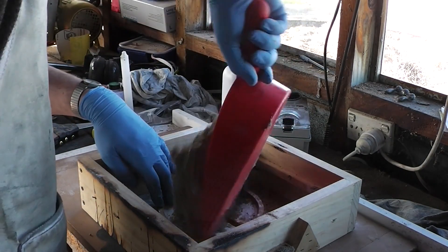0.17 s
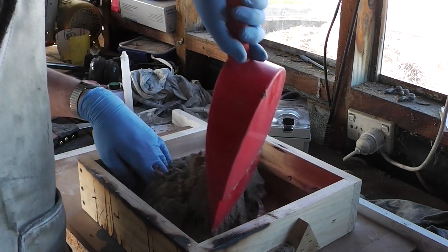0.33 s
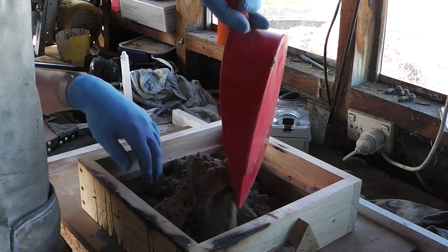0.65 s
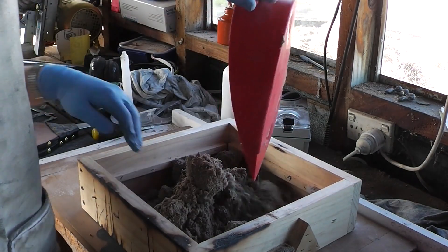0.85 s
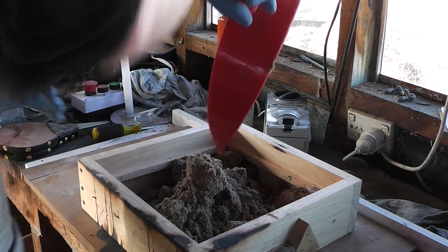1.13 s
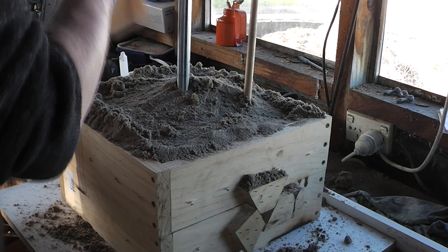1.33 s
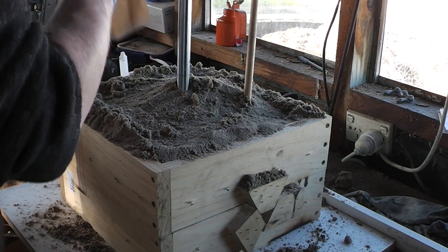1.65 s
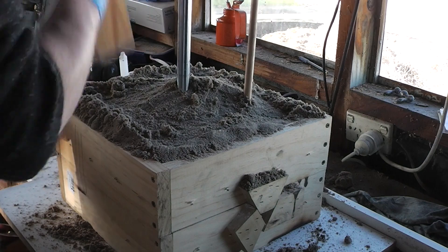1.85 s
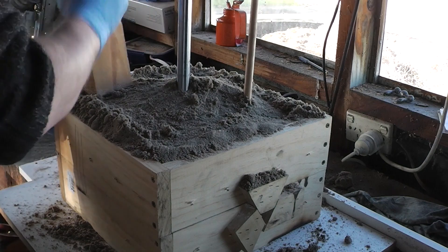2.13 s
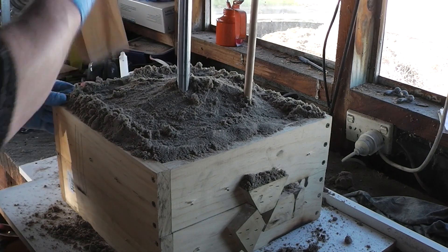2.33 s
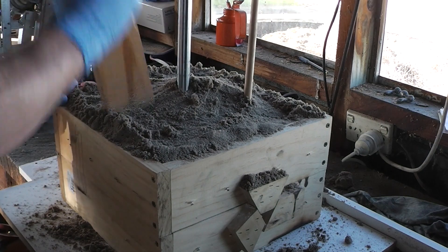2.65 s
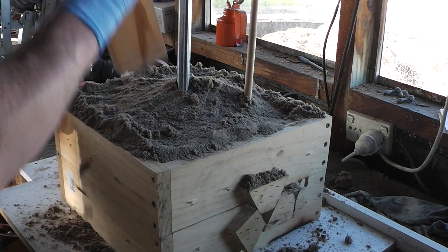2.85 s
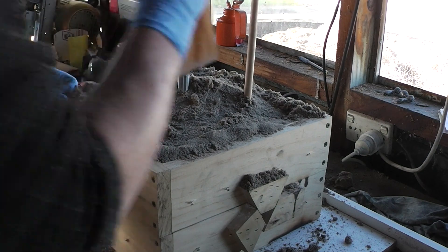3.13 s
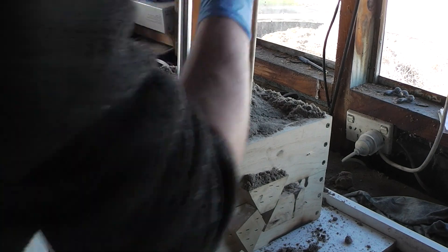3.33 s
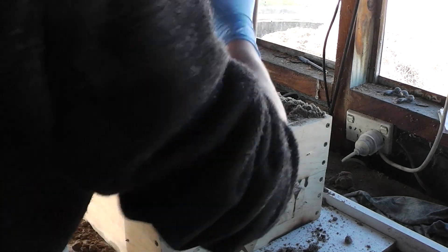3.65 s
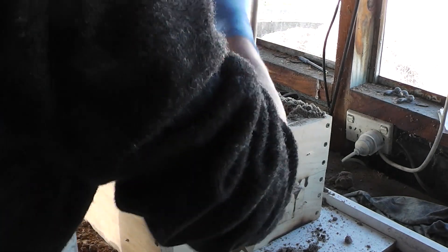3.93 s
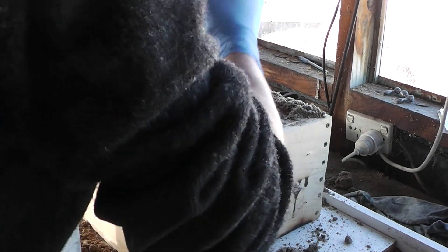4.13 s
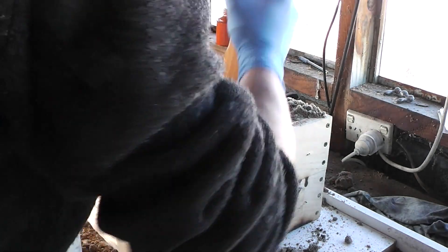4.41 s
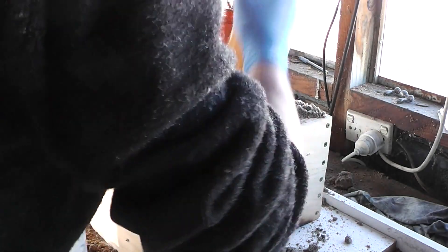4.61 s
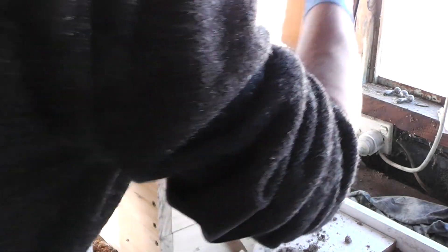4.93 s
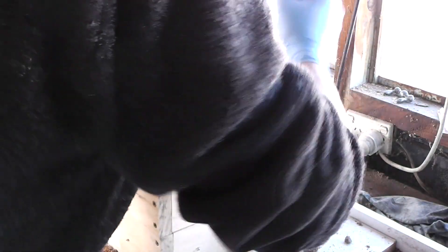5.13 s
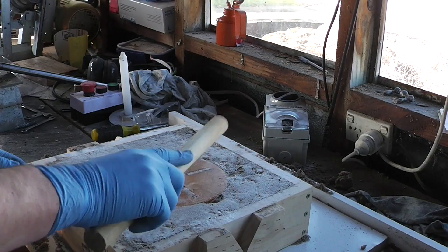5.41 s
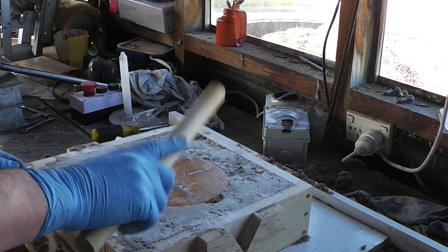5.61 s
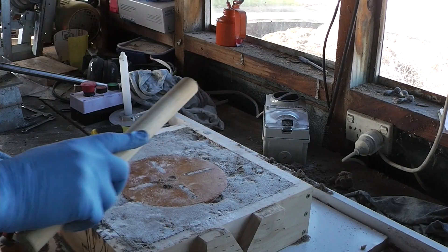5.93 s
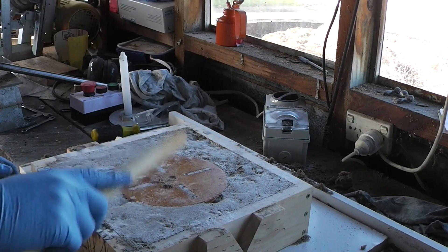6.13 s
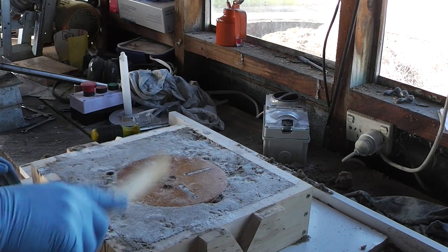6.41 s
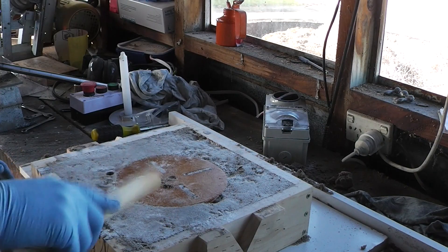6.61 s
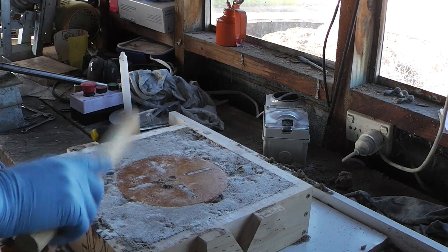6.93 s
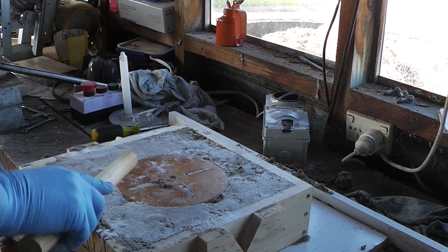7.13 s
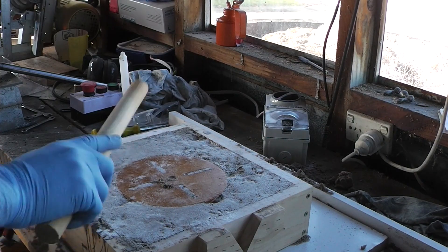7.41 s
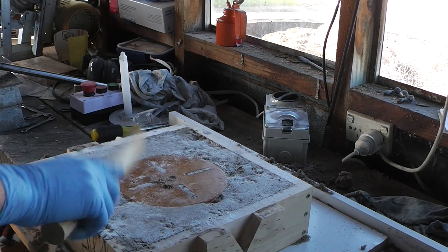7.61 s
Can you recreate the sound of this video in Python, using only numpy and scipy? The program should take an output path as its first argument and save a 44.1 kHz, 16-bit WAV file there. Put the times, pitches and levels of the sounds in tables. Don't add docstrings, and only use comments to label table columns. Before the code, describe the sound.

In a small workshop with a low fan hum, a scoop tips sand into a wooden box: a slide, a thud and a brief hissing rush. A rammer then thumps the sand unevenly, shaking box and bench, with crumbling grains and sleeve rubs between blows. A harder rim knock ends it, and abruptly a wooden rod taps a plate in loud sharp cracks. Close stereo microphone, short room echo.

```python
import sys
import numpy as np
from scipy import signal
from scipy.io import wavfile
from scipy.ndimage import uniform_filter1d

SR = 44100
rng = np.random.default_rng(int(sys.argv[2]) if len(sys.argv) > 2 else 0)


def generate_wav(sig):
    pcm = np.round(np.clip(np.atleast_2d(sig).T, -1, 1) * 32767).astype(np.int16)
    wavfile.write(sys.argv[1], SR, pcm)


def volts_from_decibels(level):
    exponent = np.asarray(level, float) / 20
    return 10 ** exponent


N = 342255
SCENE_CHANGE_S = 5.363
RUSH_S = 0.228
TAP_CUT_HZ = 12000


def at_hz(points, hz):
    log_hz, values = np.log(np.array(points)[:, 0]), np.array(points)[:, 1]
    return np.interp(np.log(hz), log_hz, values)


def clicks(s, db):
    train = np.full(N, 1e-18)
    places = np.round(np.asarray(s) * SR).astype(int)
    np.add.at(train, np.minimum(places, N - 1), volts_from_decibels(db))
    return train


def ring(x, hz, t60):
    r = volts_from_decibels(-60 / (t60 * SR))
    w = 2 * np.pi * hz / SR
    return signal.lfilter([0, np.sin(w)], [1, -2 * r * np.cos(w), r * r], x)


def strike(s, db, modes, spread_db, scatter_s):
    luck = rng.standard_normal((len(s), 2, len(modes)))
    total = 0
    for k, (hz, level_db, t60) in enumerate(modes):
        start = s + scatter_s * abs(luck[:, 1, k])
        strength_db = db + level_db + spread_db * luck[:, 0, k]
        total = total + ring(clicks(start, strength_db), hz, t60) * (-1) ** k
    return total


def soften(x, cut_hz):
    return signal.sosfilt(signal.butter(2, cut_hz, fs=SR, output="sos"), x)


# frequency in Hz, likeness (1 = the same)
LIKENESS = [(40, 0.78), (250, 0.98), (1000, 0.89), (2500, 0.85), (5000, 0.64), (9000, 0.75), (14000, 0.1)]


def bands(low_hz, high_hz, size):
    white = rng.standard_normal((2, 2, size))
    edges = 25 * 2 ** np.arange(0, 9.5, 1 / 3)
    for k, (low, high) in enumerate(zip(edges, edges[1:])):
        if low_hz < high and low < high_hz:
            band_pass = signal.butter(2, [low, high], "band", fs=SR, output="sos")
            mid, side = signal.sosfilt(band_pass, white[k % 2])
            alike = np.clip(at_hz(LIKENESS, low), 0, 1)
            stereo = np.sqrt(1 + alike) * mid + np.sqrt(1 - alike) * side * [[1], [-1]]
            yield np.sqrt(low * high), stereo


def noise(spectrum):
    out = sum(volts_from_decibels(at_hz(spectrum, hz)) * band for hz, band in bands(spectrum[0][0], spectrum[-1][0], size=N))
    return out / out.std()


def bursts(s, db, length_s):
    out = np.zeros(N)
    for start, level_db, span in zip(s, db, length_s):
        first = round(start * SR)
        fall = out[first:first + SR // 2]
        fall += volts_from_decibels(level_db - 20 * np.arange(len(fall)) / SR / max(span, .001))
    return out


def swell(middle_s, length_s, db):
    place = (np.arange(N) / SR - middle_s) / length_s
    return volts_from_decibels(db) * np.cos(np.pi * np.clip(place, -.5, .5)) ** 2


def grit(per_s, size_db):
    lumps = (rng.random(N) < per_s / SR) * volts_from_decibels(size_db * np.minimum(rng.exponential(1, N), 4))
    lumps = signal.lfilter([1], [1, -.96], lumps) + 2.1
    return lumps / np.sqrt(np.mean(lumps ** 2))


# frequency in Hz, time to fall 60 dB in seconds
ROOM_T60 = [(60, 1), (300, 0.3), (1000, 0.25), (2800, 0.2), (8000, 0.17), (15000, 0.2)]


def room(x):
    t = np.arange(SR // 2) / SR
    late_db, late_stretch = -13, 2.68
    tail = 0
    for hz, band in bands(40, 16000, size=len(t)):
        fall_db = -60 * t / at_hz(ROOM_T60, hz)
        tail = tail + band * (volts_from_decibels(fall_db) + volts_from_decibels(late_db + fall_db / late_stretch))
    tail = tail * np.minimum(t / 0.0015, 1)
    tail = tail / np.sqrt(np.sum(tail ** 2) / 2)
    return signal.fftconvolve(x, tail, axes=1)[:, :N]


def shaking(rest_db, shake_db, swell_s, fall_s):
    t = np.arange(N) / SR
    ramming = t < SCENE_CHANGE_S
    out = volts_from_decibels(rest_db - 4 * (t > SCENE_CHANGE_S))
    lump = (RUSH_S, -28)
    for at, bench_db in [lump] + [(row[0], row[3]) for row in RAMS]:
        rise = np.clip((t - at) / swell_s, 0, 1)
        out += ramming * rise * volts_from_decibels(bench_db + shake_db - 20 * np.maximum(t - at, 0) / fall_s)
    return out


# frequency in Hz, level in dB per Hz
FAN = [(180, -57), (300, 1), (680, 2), (935, 5), (1020, -1.5), (1560, -2), (1730, -7.5), (1980, -19),
       (3000, -82), (3900, -66), (6600, -120)]
AIR_HISS = [(2000, -30), (2800, -17), (3500, -9), (4300, -1), (7000, -2), (10500, -1), (12500, -10),
            (15500, -15), (16500, -22)]
FLOOR_RUMBLE = [(22, 8), (36, 10), (50, -2.5), (70, 1.5), (120, -10.5), (160, -13)]
BOX_DRONE = [(100, 2.5), (140, 5), (200, 10), (300, 0), (420, -3)]
LOOSE_BOARDS = [(30, -11), (60, 3), (110, 1), (200, -10.5), (400, -15), (800, -13)]
# middle in seconds, length in seconds, dull part in dB, bright part in dB
SLEEVE = [
    (0.574, 0.07, -74, -48.5),
    (1.18, .35, -73, -64),
    (3.074, 0.42, -52.5, -70),
    (4.145, 0.86, -48.5, -66.5),
    (6.938, 0.29, -52.5, -57.5),
]


def background(pour_db):
    fan_db = -50
    dull = sum(swell(middle_s, length_s, dull_db) for middle_s, length_s, dull_db, _ in SLEEVE)
    bright = sum(swell(middle_s, length_s, bright_db) for middle_s, length_s, _, bright_db in SLEEVE)
    air = (volts_from_decibels(fan_db) + volts_from_decibels(pour_db + 2) + dull) * noise(FAN)
    air += (volts_from_decibels(fan_db - 15) + bright) * noise(AIR_HISS)
    air += shaking(rest_db=-84, shake_db=-13, swell_s=0.024, fall_s=0.25) * noise(LOOSE_BOARDS)
    air += shaking(rest_db=-50, shake_db=-16.5, swell_s=0.15, fall_s=0.59) * noise(FLOOR_RUMBLE)
    air += shaking(rest_db=-54, shake_db=-29, swell_s=0.01, fall_s=0.55) * noise(BOX_DRONE)
    return air


def ducking():
    depth_db, hold_s, recover_db_per_s = 17.5, 0.07, 57
    t = np.arange(N) / SR
    taps_s = np.array(sorted(row[0] for row in ALL_TAPS))
    latest_s = np.append(-N, taps_s)[np.searchsorted(taps_s, t)]
    drop_db = np.clip(depth_db - recover_db_per_s * (t - latest_s - hold_s), 0, depth_db)
    drop_db = drop_db * (t > SCENE_CHANGE_S)
    return volts_from_decibels(-uniform_filter1d(drop_db, size=400))


def pour():
    t = np.arange(N) / SR
    slide_db = -48.5 - 4 * t
    rush_db = -38.5 - 95 * (t - RUSH_S)
    return np.where(t < RUSH_S, slide_db, rush_db)


# start in seconds, level in dB
SCOOP_DUMP = [(.224, -27), (.236, -26.5), (0.253, -29.5), (0.286, -30)]
# frequency in Hz, level in dB, time to fall 60 dB in seconds
SCOOP = [(111, -12.5, 0.13), (196, -2.5, 0.07), (315, 3, 0.07), (447, 5.5, 0.033), (655, 4.5, 0.067),
         (750, -2, 0.055), (1000, -16, 0.025), (1460, -3, 0.02)]


def scoop(pour_db):
    hum = ring(rng.standard_normal(N), 475, 0.17)
    hum_gain = volts_from_decibels(pour_db - 1.5) + swell(.15, 0.094, -42)
    lump = strike(*np.transpose(SCOOP_DUMP), SCOOP, 2.5, 0.00294)
    return soften(lump, 2100) + hum_gain * hum / hum.std()


# start in seconds, peak in dB, length in seconds
CRUMBS = [(0.223, -31, 0.0046), (0.9113, -49.5, 0.021), (1.038, -47.5, 0.036), (1.181, -51, 0.027),
          (1.276, -51, 0.075), (1.375, -35.5, 0.01), (1.637, -40, 0.017), (1.932, -41, 0.032),
          (2.004, -47.5, 0.0089), (2.639, -49.5, 0.02), (2.928, -48.5, 0.039), (2.9926, -42, 0.049),
          (3.13, -56, 0.021), (3.275, -55.5, 0.031), (3.314, -49, 0.095), (3.449, -50, 0.014),
          (3.577, -48, 0.024), (3.719, -49.5, 0.021), (4.486, -51.5, 0.051), (5.2055, -35, 0.004),
          (5.218, -30, 0.0032), (5.238, -34, 0.0035), (5.24, -48, 0.004)]
# start in seconds, peak in dB
TICKS = [(0.05, -28), (0.2259, -11.5), (0.5715, -25), (1.188, -29.5), (2.4382, -11.5), (2.9282, -40)]


def loose_sand(sand, crunch, pour_db):
    crumbling = (crunch + bursts(*np.transpose(CRUMBS))) * grit(per_s=960, size_db=5.5) * sand
    pouring = volts_from_decibels(pour_db) * grit(per_s=1700, size_db=5.5) * sand
    snap_s, snap_db = np.transpose(TICKS)
    snaps = strike(snap_s, snap_db - 9, CRACK, 0.96, 0)
    return crumbling + pouring + soften(snaps, TAP_CUT_HZ)


# start in seconds, thud peak in dB, thud pitch in Hz, bench level in dB,
# edge in dB (how hard the wood meets packed sand)
RAMS = [(1.323, -21.5, 319, -22.5, -41.5), (1.497, -11.5, 355, -18.5, -26.5),
        (1.941, -18, 312, -15.5, -28.5), (2.186, -12.5, 361, -15, -27.5), (2.437, -18, 280, -18.5, -30),
        (2.719, -23.5, 304, -19.5, -36.5), (2.963, -18, 311, -13.5, -30), (3.544, -32.5, 464, -51, -42),
        (3.671, -28, 250, -26, -40.5), (3.834, -28, 446, -26.5, -46.5), (3.871, -22, 248, -23, -34),
        (4.088, -18.5, 315, -21.5, -33.5), (4.441, -32, 277, -26, -40.5), (4.669, -20.5, 290, -21.5, -34.5),
        (5.177, -22.5, 338, -17.5, -21)]
# seconds after the blow, level in dB
JOLTS = [
    (0, -6),
    (.004, -2),
    (.011, -5),
    (.018, -9),
]
# seconds after the blow, level in dB
REBOUNDS = [
    (.035, -12.5),
    (.09, -9.5),
]
# start in seconds, peak in dB
PIPE_KNOCKS = [
    (3.7211, -8.5),
    (3.8355, -23),
]
# start in seconds, peak in dB
RIM_HITS = [
    (5.179, -9.5),
    (5.19, -28),
    (5.205, -33),
]
# frequency in Hz, level in dB, time to fall 60 dB in seconds
BOX = [(194.4, 8, 0.043), (260, 6.5, 0.1), (349, 9, 0.041), (433, -2.5, 0.032), (524, 5, 0.019),
       (636.4, -9, 0.098)]
WOOD_KNOCK = [(674, 4.5, 0.017), (909, 5, 0.012), (1282, 9, 0.0075), (1645, -0.5, 0.02),
              (1920, -0.5, 0.0088)]
BENCH = [(34, -5, 0.62), (37.7, -5.5, 0.26), (54.6, -2.5, 0.096), (64.9, -6, 0.32), (72.6, -2, 0.21),
         (89, -4, 0.12), (95.5, -6.5, 0.15), (163, -11.5, 0.23), (176, -8, 0.15)]
PIPE = [(464, -0.5, .02), (615, -6.5, 0.032), (760, -11, .08), (1344, -6, 0.043), (1310, -16, 0.1),
        (1513, -8.5, 0.093), (1590, -6.5, 0.071)]
RIM = [(352, 3, 0.039), (510, 1, 0.039), (590, 0, 0.035), (1020, 8, 0.017), (1660, 4.5, 0.0056)]


def rammer():
    s, thud_db, thud_hz, bench_db, edge_db = np.transpose(RAMS)
    knock_db = edge_db + 0.29 * (thud_db - edge_db) - 6
    thud = 0
    for at, db, hz in zip(s, thud_db, thud_hz):
        thud = thud + ring(clicks([at, at + 0.0054], [db, db + 6]), hz, 0.032)
    for at, db, hz in zip(s + 0.05, bench_db - 1.5, thud_hz):
        thud = thud + ring(clicks([at, at + 0.00442], [db - 4.5, db + 3]), hz, 0.03)

    steps = JOLTS + REBOUNDS
    uneven = np.exp(0.22 * rng.standard_normal((len(s), len(steps))))
    hits = [(s + lag_s * uneven[:, k], step_db) for k, (lag_s, step_db) in enumerate(steps)]
    jolts = hits[:len(JOLTS)]
    box = sum(strike(at, thud_db + db - 11.5, BOX, 0, 0.001544) for at, db in hits)
    knock = sum(strike(at, knock_db + db + 3.5, WOOD_KNOCK, 5.5, 0.001087) for at, db in jolts)
    knock += strike(*np.transpose(RIM_HITS), RIM, 1.7, 0.00074)
    bench = strike(s, bench_db - 4.5, BENCH, 1.9, 0.0042)
    bench += strike(s + 0.02955, bench_db, BENCH, 1.06, 0.0046)
    pipe_s, pipe_db = np.transpose(PIPE_KNOCKS)
    pipe = strike(pipe_s, pipe_db - 6, PIPE, 1.7, 0.00035)

    crunch = sum(bursts(at, edge_db - 7.5 + 2.33 * db, np.full(len(s), .01)) for at, db in jolts)
    sink_s = 0.036
    crunch += sum(swell(at + sink_s / 5, sink_s, db - 11) for at, db in zip(s, edge_db))
    wood = soften(thud + box, 1330) + soften(knock, 1700) + soften(pipe, 1380)
    return wood, soften(bench, 560), crunch


# start in seconds, snap peak in dB, slap in dB, ring in dB, low push into the bench in dB
TAPS = [(5.528, -1, -22.5, -28.5, -16), (5.72, -6, -24, -25, -33), (6.135, -14, -23.5, -19.5, -21),
        (6.321, -15, -21, -21.5, -34), (6.488, -13, -24.5, -22, -44), (6.683, -4.5, -21, -18.5, -53),
        (7.02, -5, -19.5, -16, -16), (7.183, -9, -21, -16, -16), (7.35, -11, -25, -21, -26),
        (7.526, -10, -27, -22.5, -48), (7.687, -3.5, -26.5, -23.5, -27)]
TAIL_TAP = [(5.354, -3, -19.5, -17.5, -44)]
BOUNCES = [
    (5.555, -15, -24.5, -44, -45),
    (6.521, -11, -24.5, -51, -52),
    (7.716, -12, -30.5, -31, -50),
]
ALL_TAPS = TAIL_TAP + TAPS + BOUNCES
# frequency in Hz, level in dB, time to fall 60 dB in seconds
SNAP = [(1134, -3.5, 0.0054), (1417, 8, 0.0027), (1814, -0.5, 0.0055)]
SLAP = [(142, -11, 0.022), (248, -8, 0.039), (420, -7, 0.01), (700, -8, 0.0041)]
CRACK = [(3240, 0.5, 0.0017), (4160, 4.5, 0.0017), (5670, 8, 0.0011), (6320, 4.5, 0.0024),
         (8490, 2.5, 0.0012), (10110, 5.5, 0.0024), (13000, 9, 0.00053), (14400, -7, 0.0022)]
ROD = [(970, -5, 0.055), (1053, -9, 0.16), (1075, -5, 0.12), (1266, -12, 0.042), (1553, 2.5, 0.011),
       (1784, -4, 0.03), (2050, -0.5, 0.017), (2680, -9.5, 0.046), (2768, -14.5, 0.098), (2810, -9, 0.026),
       (3270, -21, 0.018)]
PLATE = [(396.6, 1, 0.05), (507, 3.5, 0.03), (662.5, 3.5, 0.044), (824, 2.5, 0.016)]
FITTINGS = [(4700, -30, .12), (4790, -30, .16), (4870, -30, .14), (4945, -33, .25), (7280, -39, .6)]
# frequency in Hz, level in dB per Hz
SHUDDER = [(250, -25), (450, 3.5), (1000, 1.5), (2050, -16), (2400, -36), (3300, -41), (5000, -16),
           (12000, -29)]


def rod(sand):
    s, snap_db, slap_db, ring_db, push_db = np.transpose(ALL_TAPS)
    is_tap = np.arange(len(s)) < len(s) - len(BOUNCES)
    crack_db = np.where(is_tap, -19, -33)
    contact = strike(s, snap_db - 3, SNAP, 1.2, 0)
    contact += strike(s + .0005, slap_db + 3, SLAP, 1.2, 0)
    contact += strike(s, crack_db + 6, CRACK, 1.5, 0)
    contact += volts_from_decibels(-11.5) * np.roll(contact, round(0.0038 * SR))

    rings = strike(s, ring_db, ROD, 1.5, .0005)
    near = (s > 6.0) & is_tap
    rings += strike(s[near], np.full(near.sum(), -16), FITTINGS, 2.5, .0005)
    rings += strike(s, slap_db - 1, PLATE, 1.5, 0.0003)

    grains = bursts(s, crack_db - 6.5, np.full(len(s), .005)) * sand
    grains += bursts(s, slap_db - 9.5, np.full(len(s), 0.069)) * noise(SHUDDER)
    push = [(71, 0, 0.0086)]   # (Hz, dB, t60 s)
    grains += strike(s, push_db + 0.5, push, 0, 0)
    to_walls = soften(volts_from_decibels(-8.5) * contact + volts_from_decibels(-9.5) * rings, 8000)
    return soften(contact + grains, TAP_CUT_HZ) + rings + room(to_walls[None])


# frequency in Hz, level in dB per Hz
SAND = [(1470, -10), (2500, -0.5), (3210, -19.5), (3720, 4.5), (10400, 4), (12500, 1), (14800, -5),
        (16000, -17)]


def scene():
    pour_db = pour()
    sand = noise(SAND)
    wood, bench, crunch = rammer()
    thumps = wood + loose_sand(sand, crunch, pour_db) + scoop(pour_db)
    thumps = thumps + bench + room(volts_from_decibels(-10.5) * thumps + volts_from_decibels(-23.5) * bench)
    blows = np.where(np.arange(N) < SCENE_CHANGE_S * SR, thumps, rod(sand))
    return (blows + background(pour_db) * ducking()) * volts_from_decibels([[.3], [-.3]])


def top_cut(x):
    return signal.sosfilt(signal.butter(12, 17010, fs=SR, output="sos"), x)


def record(dry):
    x = signal.sosfilt(signal.butter(2, 26, "high", fs=SR, output="sos"), dry)
    limited = 1.712 * np.tanh(x / 1.494)
    mix = signal.sosfilt(signal.cheby2(8, 40, 16400, fs=SR, output="sos"), limited)
    return top_cut(mix)


dry = scene()
out = record(dry)
generate_wav(out)
```